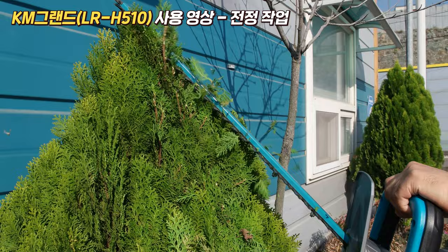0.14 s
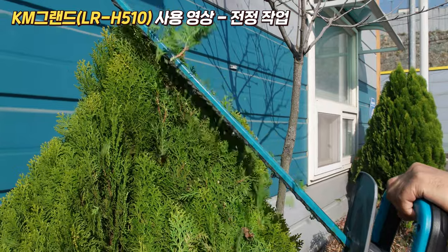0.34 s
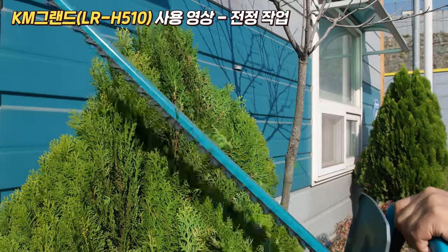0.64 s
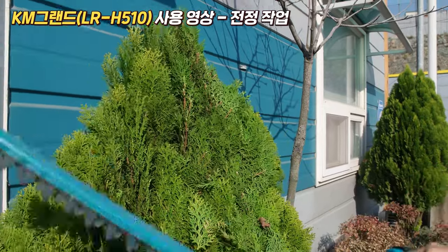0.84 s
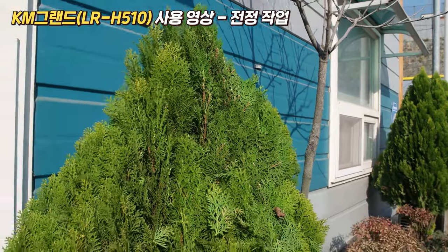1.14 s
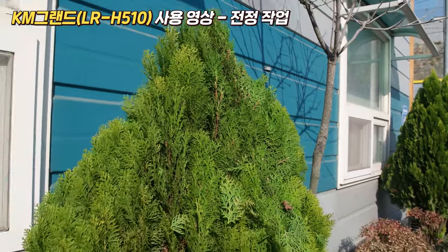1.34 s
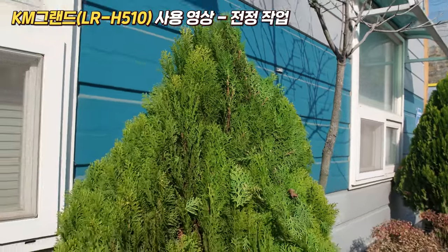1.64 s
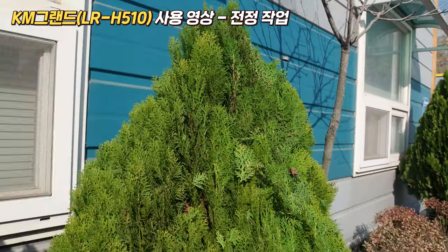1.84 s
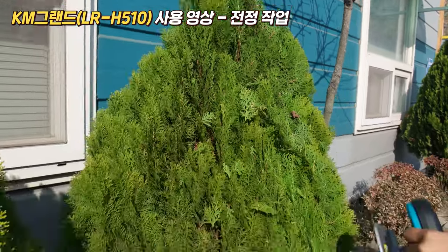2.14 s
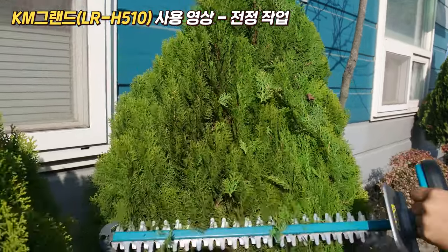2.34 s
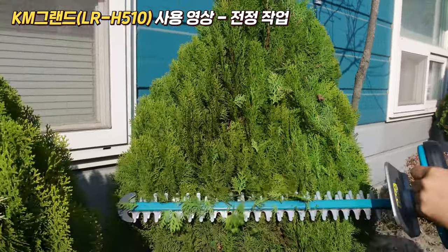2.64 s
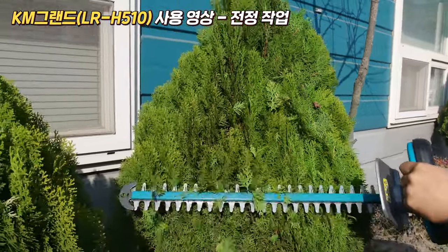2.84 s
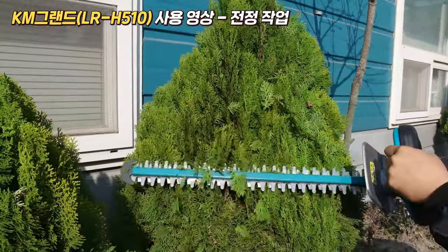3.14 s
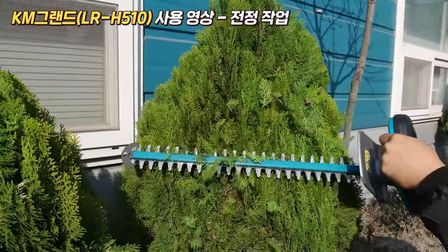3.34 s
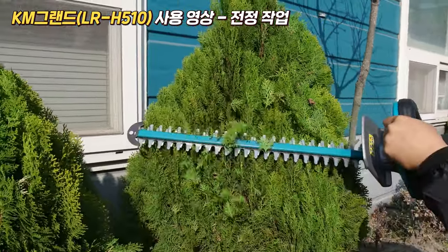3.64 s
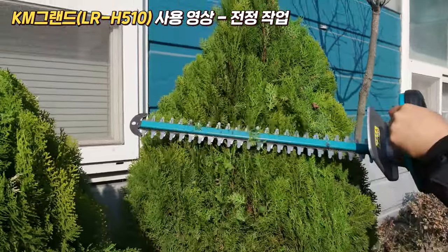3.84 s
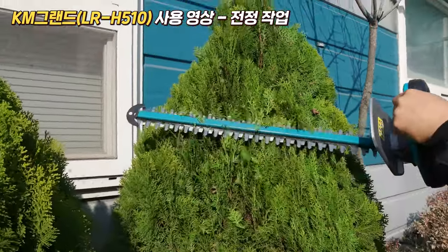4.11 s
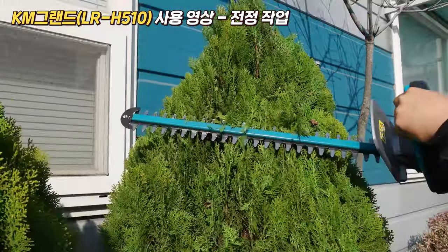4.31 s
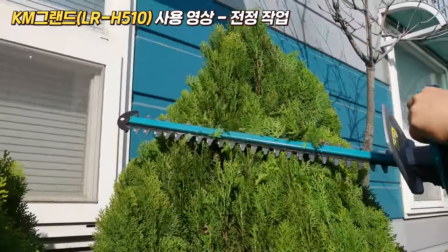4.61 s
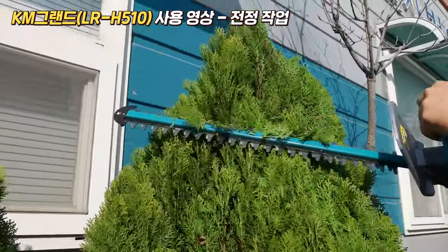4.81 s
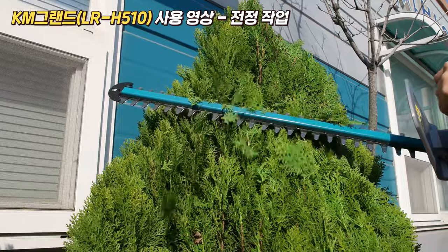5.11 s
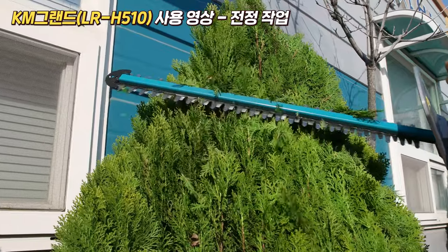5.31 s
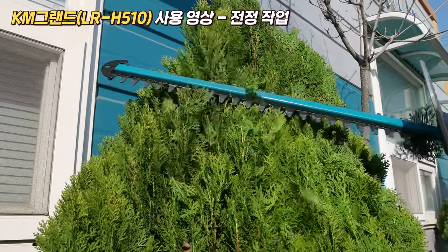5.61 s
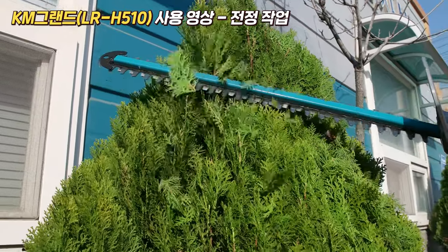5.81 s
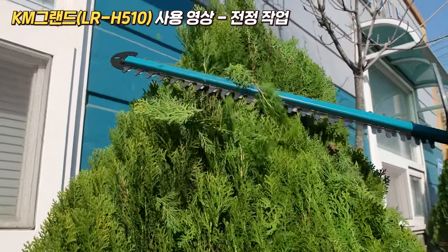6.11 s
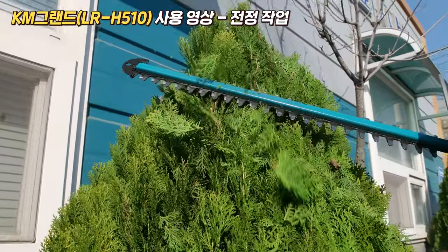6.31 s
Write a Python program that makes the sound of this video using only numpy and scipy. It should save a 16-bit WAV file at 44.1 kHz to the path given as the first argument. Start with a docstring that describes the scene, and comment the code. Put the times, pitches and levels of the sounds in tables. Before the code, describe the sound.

A battery hedge trimmer runs without a pause, close by outdoors. Its blades make a fast, rasping rattle, with a high gear whine above and a faint rush of air underneath. The motor dips very briefly a few times in the first half as it catches twigs. As the tool is turned around the shrub, the whine fades back and the rasp grows fuller.

```python
"""A rattling, rasping buzz with a whine above: a battery hedge trimmer, swung round a shrub nonstop.
The motor drives a crank through a 15:1 gear. Each crank turn repeats the same knocks in the housing
and the same scrape of tooth on tooth; the gear mesh whines and cooling air rushes underneath.
Three thicker twigs briefly bog the motor down. Turning the tool changes its colour."""
import sys
import numpy as np
from scipy import signal
from scipy.fft import rfft, irfft, next_fast_len
from scipy.io import wavfile
from scipy.ndimage import uniform_filter1d

SR = 44100
rng = np.random.default_rng(int(sys.argv[2]) if len(sys.argv) > 2 else 0)


def to_wav(sig):
    """Store sig (one row per channel, or 1-D mono) as 16-bit WAV at the path in sys.argv[1].

    Samples outside -1..1 are clipped; the rate is SR.
    """
    pcm = np.clip(np.atleast_2d(sig), -1, 1) * 32767
    pcm = np.round(pcm).astype(np.int16)
    wavfile.write(sys.argv[1], SR, pcm.T)  # frames by channels


N = 284833


def amp(db):
    """dB to gain."""
    return 10 ** (np.asarray(db) / 20)


def unit_rms(x):
    """Scale to rms 1."""
    return x / np.sqrt(np.mean(x ** 2) + 1e-20)


def in_time(rows):
    """Value columns of a time table at every sample."""
    time_s, *columns = np.transpose(rows)
    return [np.interp(np.arange(N) / SR, time_s, column) for column in columns]


def at_hz(rows, hz):
    """Interpolate a spectrum on a log frequency axis."""
    freq_hz, values = np.transpose(rows)
    return np.interp(np.log(hz + 1), np.log(freq_hz), values)


def drift(rate_hz, hop=40):
    """Low-passed random wander, rms about 1."""
    pole = np.exp(-2 * np.pi * rate_hz * hop / SR)
    noise = rng.standard_normal(N // hop + 2002)
    slow = signal.lfilter([1], [1, -2 * pole, pole * pole], noise)[2000:]
    return np.interp(np.arange(N) / hop, np.arange(len(slow)), unit_rms(slow))


def first_to_last(first, last, attitude):
    """Crossfade from attitude 0 to attitude 3."""
    return first + (last - first) * attitude / 3


def by_attitude(columns, attitude):
    """Crossfade between neighbouring attitudes, one column each."""
    return sum(np.clip(1 - np.abs(attitude - k), 0, 1) * column for k, column in enumerate(columns))


def surface_roughness(turns, wear_turns=17.51, grain_db=4.5, spots=16384):
    """Roughness met again each turn; one pattern slowly gives way to the next as the blades shift."""
    patterns = int(turns[-1] / wear_turns) + 2
    coarse = rng.standard_normal((40, 2048))[:patterns] * amp(grain_db * rng.standard_normal(2048))
    fine = signal.resample(coarse, spots, axis=1)
    age = turns / wear_turns
    pattern, spot = age.astype(int), (turns % 1 * spots).astype(int)
    fade = np.pi / 2 * (age % 1)
    return unit_rms(np.cos(fade) * fine[pattern, spot] + np.sin(fade) * fine[pattern + 1, spot])


# Contacts in the gear housing: phase_turns, relative_db in attitudes 0-3
CONTACTS = [(0.0256, 0, -7, -6, -6), (0.0466, -30, -17, -11, -7), (0.1108, -2, -9, -9, -14),
            (0.1677, -7, -9, -1, -3), (0.1968, -17, -9, -30, -14), (0.2213, -30, -15, -1, -4),
            (0.2547, -30, -2, -15, -2), (0.3444, -1, -11, -22, -23), (0.3844, -30, -6, -5, -11),
            (0.4374, -14, -9, -1, -6), (0.5313, -5, -7, -16, -7), (0.5733, -6, -10, -11, -19),
            (0.622, -7, -8, -7, -9), (0.6579, -7, -10, -17, -5), (0.6951, -7, -13, -8, -30),
            (0.8043, -2, -30, -18, -30), (0.8225, -30, 0, 0, 0), (0.8553, -7, -7, -9, -7),
            (0.8962, -1, -10, -18, -10), (0.9234, -30, -4, -3, -12), (0.9536, -4, -5, -11, -2),
            (0.9744, -30, -15, 0, -8)]
# Clear of foliage, the blades slap through their slack at reversal: time_s, boost_db
SLACK_SLAP = [(0.0, -1), (1.1, -1), (1.27, 4), (1.45, 7), (1.7, 2.5), (2.15, 2), (2.3, 0), (6.46, 0)]
# Housing resonances: freq_hz, width_hz
HOUSING_MODES = [(680, 150), (900, 250)]


def housing_knocks(turns, attitude, roughness, scatter_db=.8, scatter_turns=.0005, cam_rub_db=-37):
    """Slightly uneven contacts and the rubbing cam ring the housing; rms held near 1."""
    phase_turns, *levels_db = np.transpose(CONTACTS)
    due_turns = np.arange(int(turns[-1]) + 1)[:, None] + phase_turns
    timing, force = rng.standard_normal((2,) + due_turns.shape)
    hits = np.interp(due_turns + scatter_turns * timing, turns, np.arange(N)).round().astype(int)
    at_reversal = (phase_turns > .79) & (phase_turns < .87)
    slap_db = in_time(SLACK_SLAP)[0][hits] * at_reversal
    drive = np.zeros(N)
    drive[hits] = by_attitude(amp(levels_db), attitude[hits]) * amp(scatter_db * force + slap_db)
    drive += amp(cam_rub_db) * roughness
    ring = 0
    for freq_hz, width_hz in HOUSING_MODES:
        pole, step_rad = np.exp(-np.pi * width_hz / SR), 2 * np.pi * freq_hz / SR
        feedback = [1, -2 * pole * np.cos(step_rad), pole ** 2]
        ring += (1 - pole ** 2) * signal.lfilter([1, 0, -1], feedback, drive)
    ring = signal.sosfilt(signal.butter(3, (430, 1080), "band", fs=SR, output="sos"), ring)
    return ring / np.sqrt(uniform_filter1d(ring ** 2, size=8192) + 1e-12)


# Tooth edges passing: phase_turns, first_attitude_db, last_attitude_db (before band depth)
TOOTH_SNIPS = [(0.1, 1.5, 1.5), (0.22, -5, 3), (0.35, 1.5, 3), (0.497, 4, 3), (0.56, 1.5, 2),
               (0.625, 0.5, 3), (0.71, -0.5, 5), (0.85, 2.5, 2.5), (0.96, 4, 5.5)]


def blade_pressure(turns, attitude, build_share=.75, snip_build_turns=.024, snip_release_turns=.008):
    """Pressure in dB, before band depth: builds through each stroke, drops at reversal, peaks at snips."""
    stroke_phase = 2 * (turns - .265) % 1
    pressure_db = np.interp(stroke_phase, [0, build_share, 1], [-2, 2, -2])
    pressure_db += 1.5 * np.cos(2 * np.pi * (turns - .4))  # forward stroke presses harder
    for phase_turns, first_db, last_db in TOOTH_SNIPS:
        past_turns = turns % 1 - phase_turns
        width_turns = np.where(past_turns < 0, snip_build_turns, snip_release_turns)
        snip = np.exp(-.5 * (past_turns / width_turns) ** 2)
        pressure_db += first_to_last(first_db, last_db, attitude) * snip
    return pressure_db


# Scrape spectrum, attitude 0: freq_hz, relative_db
FIRST_COLOUR = [(680, -31), (1150, -12), (1270, -18.5), (1840, -11), (2190, -8.5), (2410, -8), (2550, -5.5),
                (3000, -12), (4500, -16), (6310, -24), (12100, -21), (14500, -33), (15600, -43)]
# Scrape spectrum, attitude 3: freq_hz, relative_db
LAST_COLOUR = [(680, -19.5), (1150, -11.5), (1380, -1), (2010, -4.5), (2520, -3), (2690, -8), (3100, -7),
               (4400, -1), (6040, -12), (7930, -12.5), (9650, -14.5), (11700, -15), (15600, -30)]
# Blade resonances: freq_hz, width_hz, lift_db in attitudes 0-3
BLADE_MODES = [(1381, 48, 9, 7, 4, 5.5), (2210, 117, 5, 6, 3, 1), (3324, 180, 2, 4, 5.5, 0),
               (3606, 120, -1, 3, 4.5, 3.5), (4420, 280, 8, -1, -3, 2.5), (4806, 56, 9, 2, 6, 4),
               (5490, 160, 1, 2.5, -7, 6), (6720, 300, 7, 2.5, 0, 4.5), (7940, 270, 6.5, -9, -8, 9),
               (8530, 200, 7.5, -5, 1, 7.5), (9200, 490, 5.5, 4, 2.5, 3), (9760, 350, 0, -8, 5, -3),
               (10110, 250, -1, 6, -3, 12), (11000, 380, -4, -7, -6, -1), (5700, 330, 3.5, -0.5, -2, -4),
               (13800, 300, 2, 1, 5, 7), (11480, 200, 2, -8, -4, 7.5), (12420, 190, 3, 4, 14.5, 8),
               (13000, 90, -4, 1, 1, -3)]
# Part of the scrape that repeats each turn: freq_hz, power_share
REPEAT_SHARE = [(1000, 0.51), (3000, 0.58), (14000, 0.27)]


def blade_scrape(turns, attitude, roughness, low_depth=.75, high_depth=1.45, crossover_hz=5500):
    """Repeating and fresh roughness, pressed by the stroke, excite the blade modes; treble rms near 1."""
    pressure_db = blade_pressure(turns, attitude)
    size = 2 * next_fast_len(N // 2 + 1)
    hz = np.arange(size // 2 + 1) * SR / size
    repeat_share = at_hz(REPEAT_SHARE, hz)
    high_band = 1 / (1 + (crossover_hz / (hz + 1)) ** 4)
    noise = rng.standard_normal(N)
    friction = 0
    for depth, band in ((low_depth, 1 - high_band), (high_depth, high_band)):
        pressure = unit_rms(amp(depth * pressure_db))
        repeating = np.sqrt(repeat_share) * rfft(pressure * roughness, size)
        fresh = np.sqrt(1 - repeat_share) * rfft(pressure * noise, size)
        friction += band * (repeating + fresh)
    sides = []
    for side in range(4):
        lift_db = sum(lifts_db[side] / (1 + (2 * (hz - freq_hz) / width_hz) ** 2)
                      for freq_hz, width_hz, *lifts_db in BLADE_MODES)
        colour_db = first_to_last(at_hz(FIRST_COLOUR, hz), at_hz(LAST_COLOUR, hz), side)
        spectrum = friction * amp(colour_db + lift_db)
        treble_rms = np.sqrt(2 * np.sum(np.abs(spectrum[hz > 2800]) ** 2) / N / size)
        sides.append(irfft(spectrum, size)[:N] / treble_rms)
    return by_attitude(sides, attitude)


GEAR_TEETH, MESH_HARMONICS = 120, (1, 3, 4, 5)
# Gear mesh tones: time_s, level_db for each of MESH_HARMONICS
MESH_LEVELS = [(0.0, -21.5, -32, -40, -44), (0.5, -19.5, -34, -45, -46), (0.9, -21, -38, -46, -46),
               (1.25, -18.5, -52, -44, -41), (1.5, -24, -54, -34, -31), (1.75, -20, -35, -37, -48),
               (2.0, -20.5, -35, -33, -51), (2.3, -26.5, -56, -41, -33), (2.75, -34, -53, -30, -36),
               (3.25, -25, -58, -38, -49), (3.5, -26, -39, -39, -48), (4.0, -32, -44, -32, -38),
               (4.6, -30.5, -52, -46, -43), (5.25, -31, -38, -42, -43), (5.75, -31, -39, -43, -40),
               (6.1, -30.5, -38, -35, -43), (6.46, -40, -39, -32, -46)]
# Rotation tones, mostly multiples of the motor's 15 a turn: cycles_per_turn, level_db in attitudes 0-3
MOTOR_TONES = [(10, -55, -54, -54, -53), (12, -56, -54, -52, -50), (14, -49, -50, -48, -44),
               (15, -41, -36, -50, -38), (105, -29, -29, -26.5, -35), (135, -42, -37, -55, -55),
               (191, -45, -45, -45, -40), (225, -45, -45, -45, -40), (240, -48, -42, -36, -44),
               (375, -44, -43, -50, -39), (465, -48, -50, -45, -43), (495, -45, -46, -46, -46),
               (540, -44, -58, -58, -44), (585, -47, -43, -44, -46)]


def gear_whine(turns, attitude, load_depth=.12, load_lag_turns=.024, waver_turns=.00043, wobble_db=1.5):
    """Mesh and motor tones share one wavering rotation; the mesh swells with each stroke's load."""
    crank_rad = 2 * np.pi * (turns + waver_turns * drift(rate_hz=23))
    load = 1 + load_depth * np.cos(4 * np.pi * (turns - load_lag_turns))
    mesh = sum(amp(level_db) * np.sin(harmonic * GEAR_TEETH * crank_rad)
               for harmonic, level_db in zip(MESH_HARMONICS, in_time(MESH_LEVELS)))
    motor = 0
    for cycles_per_turn, *levels_db in MOTOR_TONES:
        level_db = by_attitude(levels_db, attitude) + wobble_db * drift(rate_hz=.83)
        motor += amp(level_db) * np.sin(cycles_per_turn * crank_rad + 2 * np.pi * rng.random())
    return np.sqrt(2) * (load * mesh + motor)


# Air noise spectrum: freq_hz, relative_db
AIR_COLOUR = [(18, -58), (30, -27), (60, -22.5), (149, -22.5), (264, -16.5), (309, -16.5), (366, -15),
              (581, -9.5), (668, -6.5), (854, -4), (1200, -26.5), (1560, -62), (2640, -120)]


def air_rush(level_db=-26):
    """Steady low noise of the motor's cooling air and the open air."""
    hz = np.arange(N // 2 + 1) * SR / N
    spectrum = rfft(rng.standard_normal(N)) * amp(at_hz(AIR_COLOUR, hz))
    return amp(level_db) * unit_rms(irfft(spectrum, N))


# Thicker twigs caught: peak_s, sag_hz
TWIGS = [(0.32, 38), (1.51, 30), (2.74, 14)]


def twig_sag(bite_s=.033):
    """Mesh rate lost, in Hz, as each twig bogs the motor down."""
    time_s = np.arange(N) / SR
    return sum(sag_hz * np.exp(-np.abs(time_s - peak_s) / bite_s) for peak_s, sag_hz in TWIGS)


# Gear speed before twig sag: time_s, mesh_hz
MESH_RATE = [(0.0, 2562.6), (0.15, 2563.3), (0.22, 2552.3), (0.5, 2573.5), (0.7, 2577.2), (1.0, 2561.9),
             (1.7, 2557.0), (2.1, 2554.5), (2.33, 2507.4), (2.55, 2499.9), (2.85, 2503.2), (3.1, 2529.1),
             (3.5, 2550.2), (4.2, 2547.0), (5.2, 2549.3), (5.9, 2539.4), (6.46, 2536.4)]
# Side of the tool facing the listener: time_s, attitude (0-3)
ATTITUDE_PATH = [(0, 0.01), (1.1, 0.05), (1.4, 0.45), (1.5, 1.01), (2.1, 1.05), (2.35, 1.99), (2.9, 2.05),
                 (3.4, 2.8), (4.3, 3), (6.46, 3)]
# Levels as the tool is swung: time_s, housing_db, blades_db
SWING_LEVELS = [(0.0, -18.5, -20.5), (0.5, -19.5, -20), (1.0, -18, -20.5), (1.9, -17.5, -20.5),
                (2.3, -18.2, -19.5), (2.75, -19.5, -19), (3.2, -18, -20), (4.4, -17, -18.7),
                (5.0, -17.5, -18), (6.46, -18, -18)]


def scene(knock_db_per_sag_hz=.03):
    """One crank rotation drives knocks, scrape and whine over the air rush; mono."""
    sag_hz = twig_sag()
    mesh_hz = in_time(MESH_RATE)[0] - sag_hz
    turns = np.cumsum(mesh_hz) / SR / GEAR_TEETH
    attitude = in_time(ATTITUDE_PATH)[0]
    roughness = surface_roughness(turns)
    housing_db, blades_db = in_time(SWING_LEVELS)
    knocks = amp(housing_db + knock_db_per_sag_hz * sag_hz) * housing_knocks(turns, attitude, roughness)
    scrape = amp(blades_db) * blade_scrape(turns, attitude, roughness)
    return (knocks + scrape + gear_whine(turns, attitude) + air_rush())[None]


def record(dry, ceiling=1.6, cutoff_hz=15650):
    """Soft clip, then a steep low-pass."""
    rounded = ceiling * np.tanh(dry / ceiling)
    return signal.sosfilt(signal.ellip(10, .5, 70, cutoff_hz, fs=SR, output="sos"), rounded)


dry = scene()
out = record(dry)
to_wav(out)
```